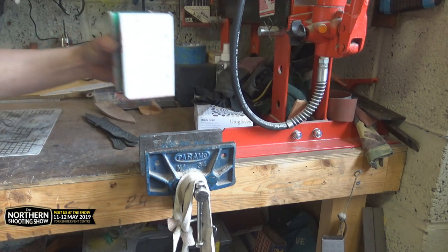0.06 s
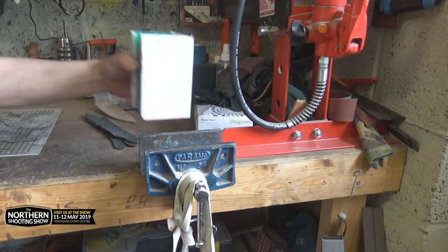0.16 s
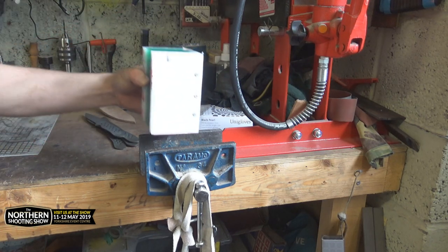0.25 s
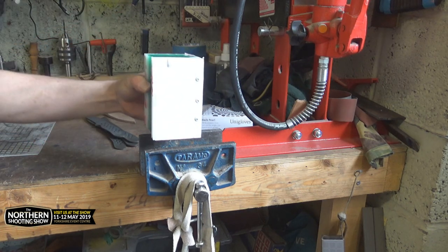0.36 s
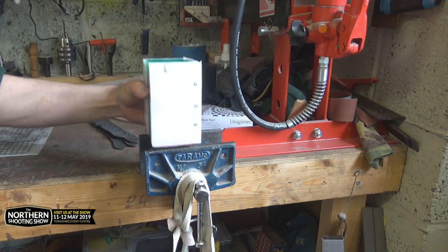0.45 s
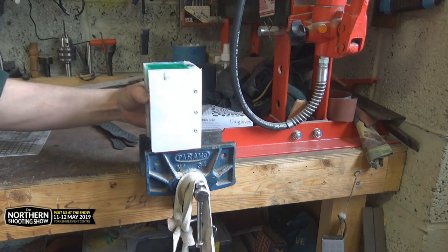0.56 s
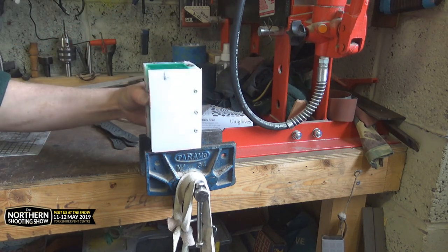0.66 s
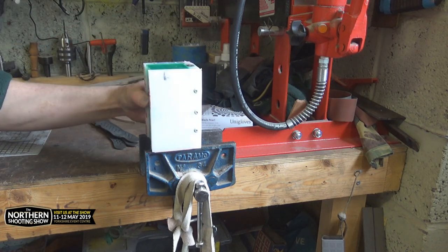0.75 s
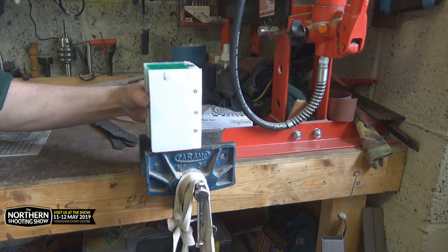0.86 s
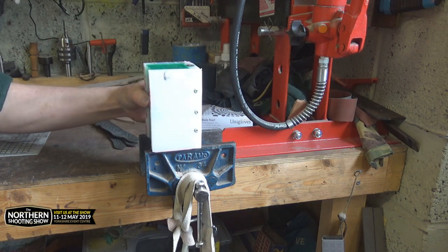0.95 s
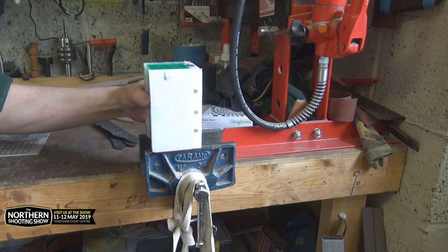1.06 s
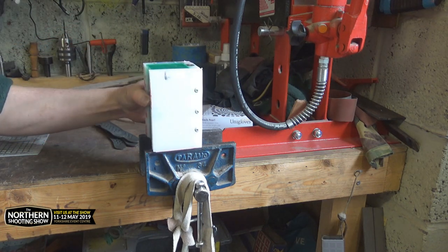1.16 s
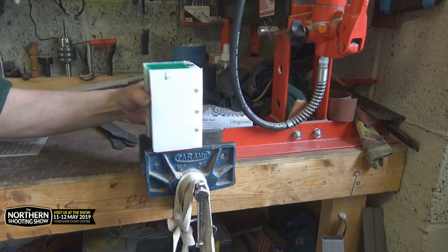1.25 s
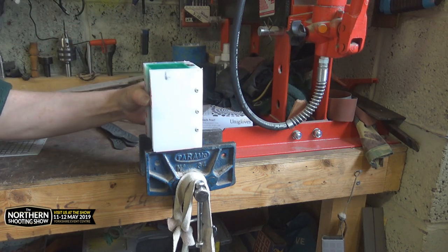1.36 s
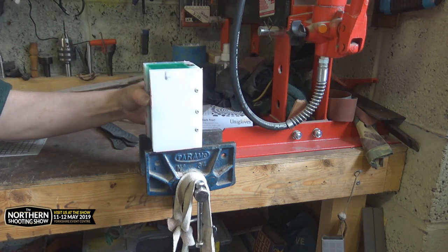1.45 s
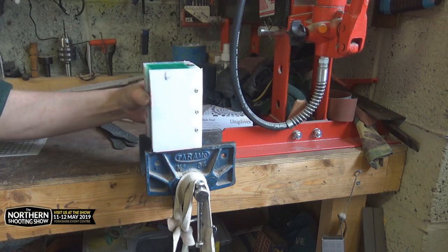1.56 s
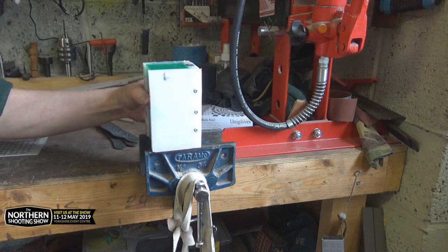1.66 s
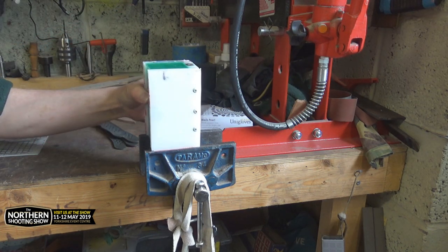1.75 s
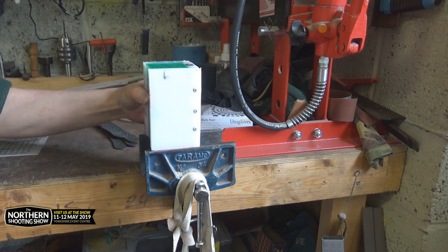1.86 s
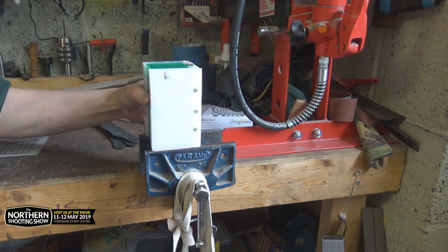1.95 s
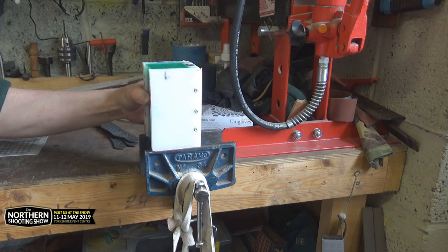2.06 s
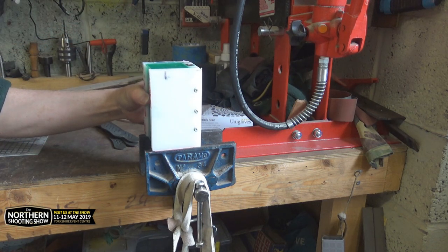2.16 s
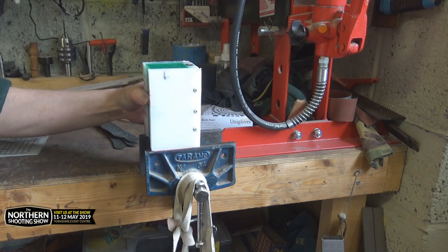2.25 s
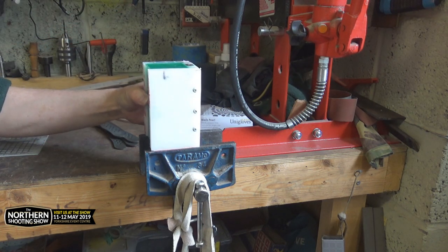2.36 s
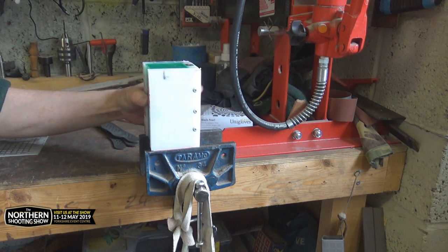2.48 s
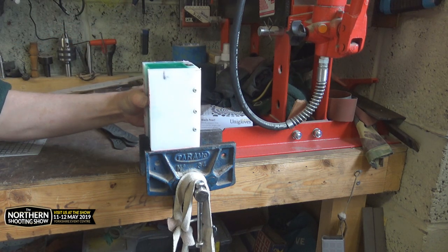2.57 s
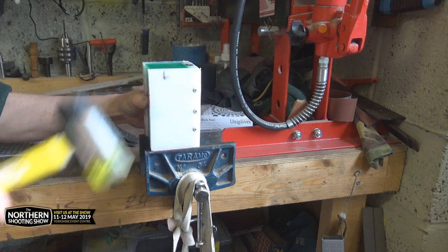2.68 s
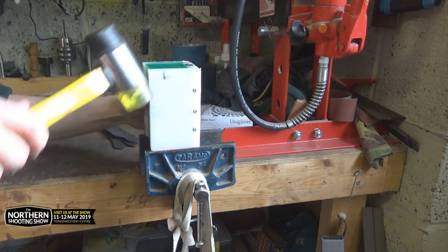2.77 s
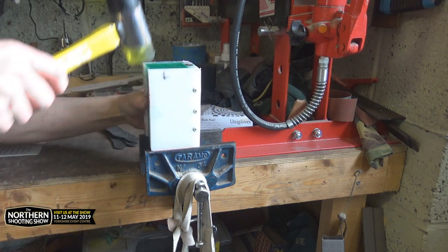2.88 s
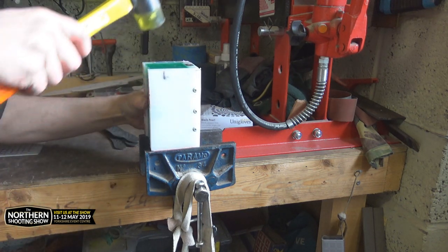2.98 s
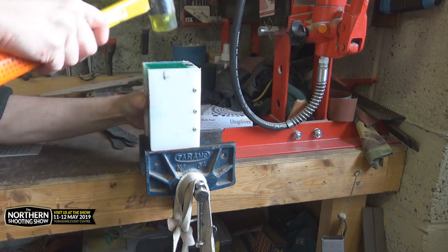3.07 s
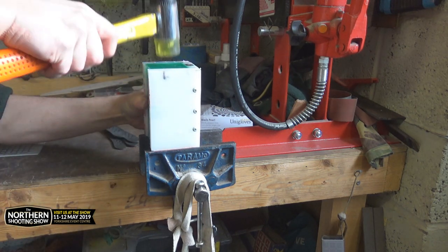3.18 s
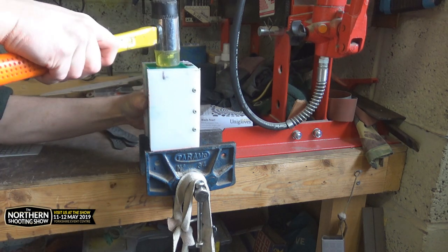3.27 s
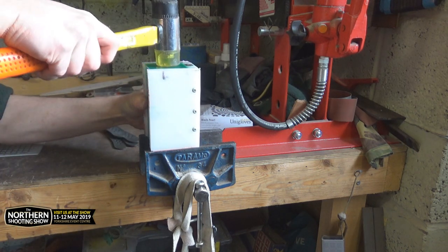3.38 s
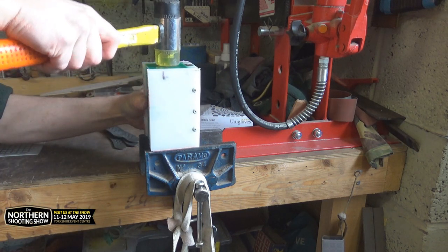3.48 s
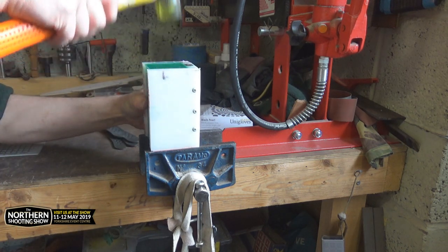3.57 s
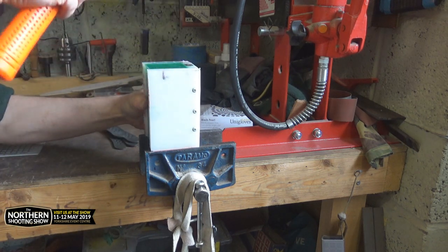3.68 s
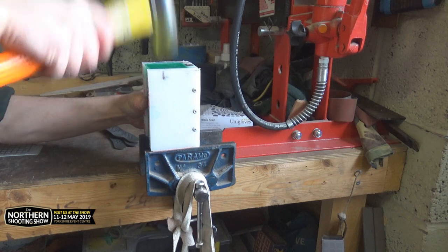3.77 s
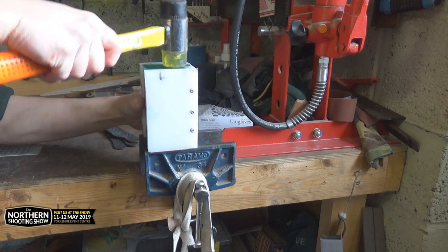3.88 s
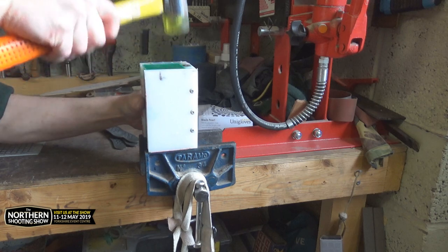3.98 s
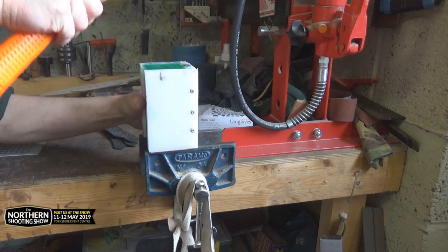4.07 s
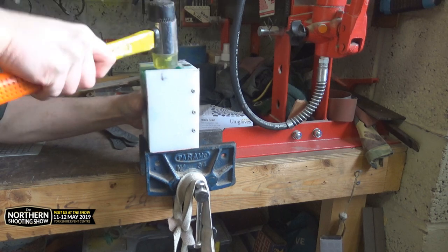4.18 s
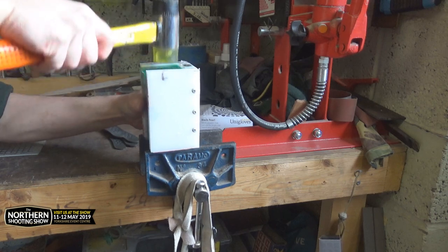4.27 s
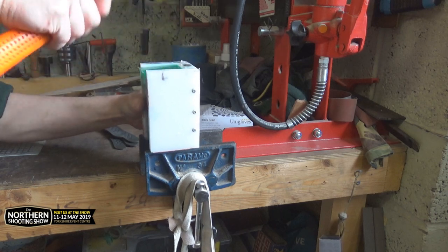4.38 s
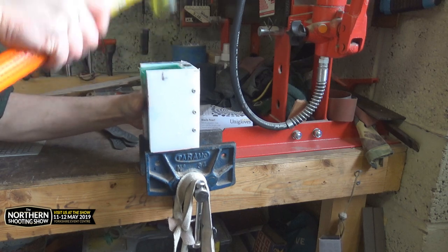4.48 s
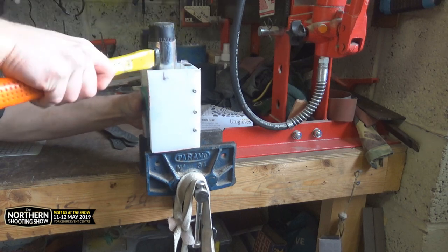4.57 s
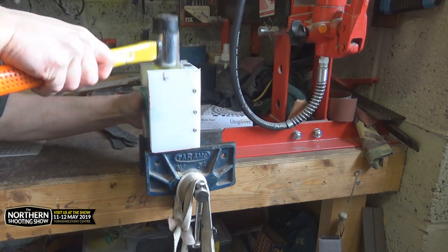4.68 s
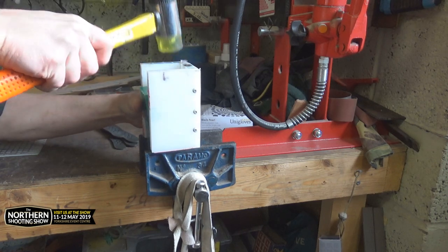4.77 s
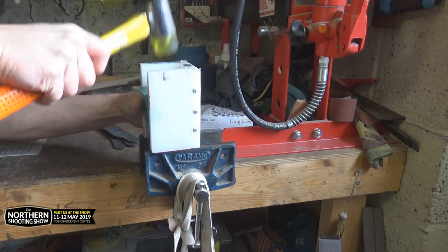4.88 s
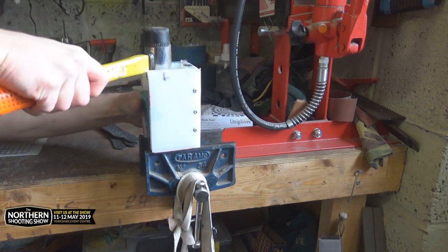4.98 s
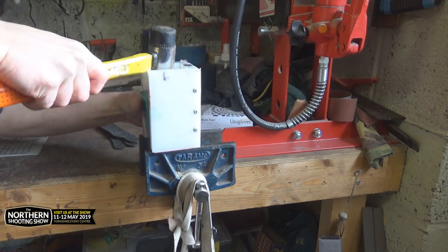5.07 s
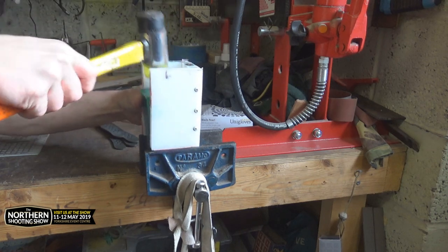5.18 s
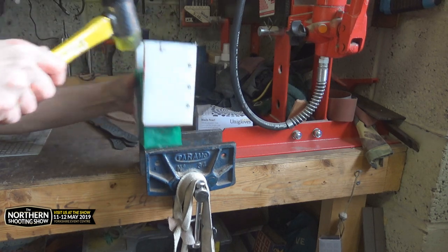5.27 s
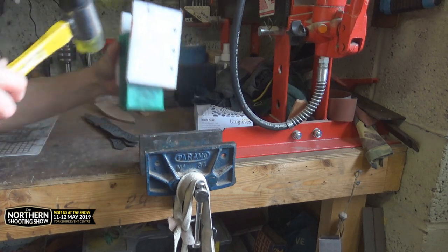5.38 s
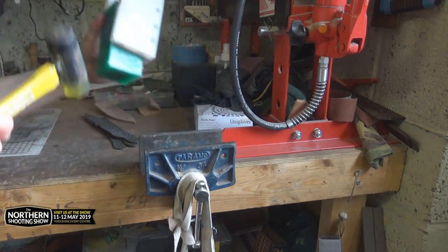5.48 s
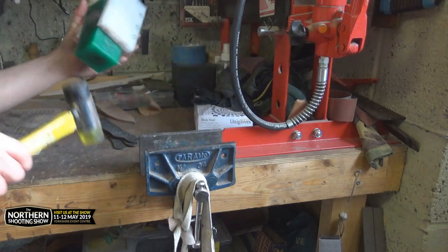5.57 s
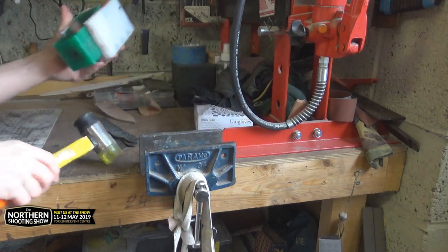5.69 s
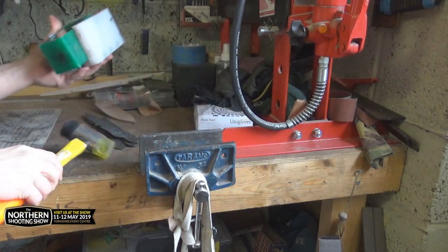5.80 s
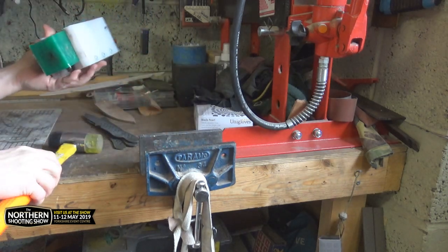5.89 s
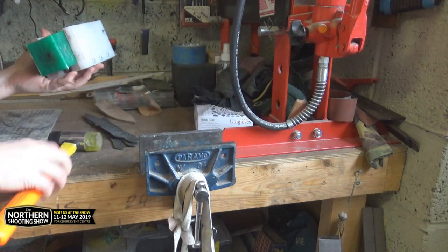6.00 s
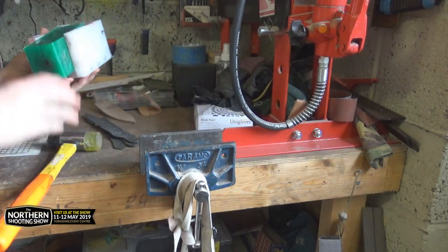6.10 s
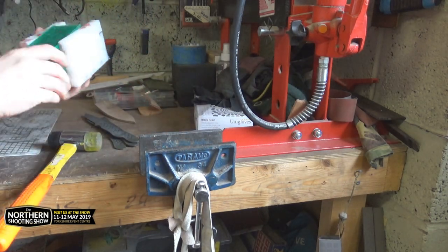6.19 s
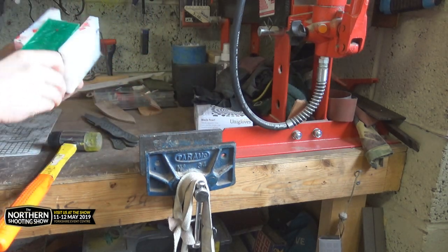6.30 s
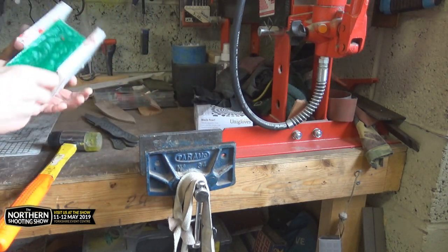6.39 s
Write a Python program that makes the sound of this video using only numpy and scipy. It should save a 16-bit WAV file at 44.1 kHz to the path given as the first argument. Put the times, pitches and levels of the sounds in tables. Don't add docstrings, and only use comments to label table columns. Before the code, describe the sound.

Cloth and hand rustle, then one solid knock of plastic on metal. Quiet room hiss and a fast buzzing tick of a focus motor beside the microphone fill the pause, with a slight nudge. A mallet cracks on the mould's rim five times, the middle three hardest, with rattling metallic edges and short room echoes. Soft scrapes release the block; a woody clatter ends it in the compact stone-walled workshop.

```python
import sys
import numpy as np
from scipy import signal
from scipy.io import wavfile
from scipy.ndimage import uniform_filter1d

SR = 44100
rng = np.random.default_rng(int(sys.argv[2]) if len(sys.argv) > 2 else 0)


def elevation(decibels):
    levels = np.asarray(decibels, float)
    return 10 ** (levels / 20)


def log_audio(samples):
    frames = np.atleast_2d(samples).T
    limited = np.clip(frames, -1, 1)
    pcm = np.round(limited * 32767).astype(np.int16)
    wavfile.write(sys.argv[1], SR, pcm)


N = 284004

BAND_EDGES_HZ = 22.5 * 2 ** np.arange(0, 9.8, 1 / 3)
CENTRES_HZ = np.sqrt(BAND_EDGES_HZ[1:] * BAND_EDGES_HZ[:-1])

# freq_hz, t60_s
ROOM_T60 = [(100, 0.45), (260, 0.37), (700, 0.39), (1840, 0.32), (4850, 0.33), (12800, 0.27)]
# freq_hz, likeness (1 = mono)
LIKENESS = [(60, 0.93), (150, 1), (380, .92), (950, 0.66), (2380, 0.64), (5980, 0.73), (15000, 1)]
# freq_hz, level_db
AIR_COLOUR = [(18, -44), (32, -11), (62, -6), (100, -11), (145, -9), (194, -9.5), (245, -7.5), (404, -1.5),
              (449, -2), (913, 4), (2350, -6.5), (2980, -6.5), (3310, -4.5), (3670, -7), (14800, -16),
              (16000, -29)]
# pitch_hz, rms_db
WHINES = [(202, -83.5), (7812, -82)]
# peak_s, hiss_db, rise_20db_s, fall_20db_s
RUSTLES = [(.02, -62, .05, .7), (.145, -60, .02, .3), (.45, -60, .09, .5), (1.785, -64, .012, .1),
           (1.96, -70, .15, .1), (2.26, -70, .06, .08), (2.5, -66, .2, .08), (2.77, -65, .5, .03),
           (2.845, -60, .08, .05), (2.902, -59, .02, .14), (5.64, -61, .13, .5), (5.69, -59, .15, .03),
           (6.35, -55, .07, .12)]
# freq_hz, level_db
CLOTH_COLOUR = [(880, -35), (1500, -5), (1620, -8.5), (3090, 1.5), (3350, 0.5), (4730, 1), (8320, 4.5),
                (16000, -16.5)]
# start_s, peak_db, pitch_hz
SNAPS = [(0.1423, -51, 1620), (0.156, -45, 2300), (0.2028, -54, 1670), (0.4338, -47, 6800),
         (0.5368, -50, 3500), (0.7586, -37, 2900), (0.7864, -62, 1510), (0.8058, -41, 11000),
         (1.7713, -53, 3330), (2.2696, -50, 1900), (2.615, -57, 3330), (2.6442, -49, 3250),
         (2.757, -49, 2400), (2.8975, -52, 7240), (5.306, -32, 1510), (5.3731, -28.5, 1730),
         (5.378, -34, 3900), (5.4022, -38, 1700), (5.4354, -54, 2010), (5.8698, -39, 5700),
         (5.9305, -43, 1530), (5.9803, -36, 2200), (6.175, -20, 900), (6.336, -46, 9000), (6.35, -40, 6200)]

# start_s, peak_db, spot_hz, echo_share_db, body_ring_db
SET_DOWN = [
    (0.629, -13, 1000, -6.5, -1),
]
NUDGED = [
    (1.943, -38, 700, -4, 2),
    (1.965, -44, 160, -6, 2),
]
BLOCK_SLIP = [
    (5.304, -33, 357, -7, 0),
    (5.362, -35, 1370, -2, -2.3),
    (5.374, -25, 304, -7, -1),
    (5.376, -35, 3700, -2, -8),
    (5.401, -40, 1500, -6, -2),
    (5.433, -33, 392, -10, 0),
]
LAID_DOWN = [(5.872, -28.5, 400, -9, 4.5), (5.93, -27, 1500, -8, -10), (5.957, -29, 900, -14.5, -7),
             (5.981, -37, 2100, -3, 5), (6.018, -19, 385, -6.5, -5), (6.023, -8, 600, -3, -2.5),
             (6.078, -18.5, 347, -20.5, -9), (6.173, -23, 1000, -9, -14), (6.207, -22, 335, -7, -3),
             (6.214, -17, 330, -6, 0), (6.263, -31, 260, -20, 8), (6.348, -40, 2500, -2, -5)]
# start_s, strength_db (before limiter), echo_share_db, vice_ring_db, jaw_landing_ms
BLOWS = [
    (3.348, -7.5, -8.5, -5, 4.2),
    (3.9256, 7, -4, -4, 8.5),
    (4.3006, 8.5, -9.5, -8, 9.5),
    (4.647, 7.5, -13, -21, 8),
    (5.058, -11.5, -0.5, -15, 7),
]

# freq_hz, level_db_per_hz
MOULD_FOOT_COLOUR = [(53, -75), (90, -48.5), (153, -5.5), (333, -13), (403, 3.5), (439, -14), (519, -3.5),
                     (565, -5), (1000, -4.5), (1560, -20), (4480, -27), (14000, -51.5)]
NUDGE_COLOUR = [(35, -79), (60, -49), (151, -10), (356, -7), (403, -14), (446, 2), (842, -7), (1190, -19),
                (8000, -40), (10400, -71), (17600, -120)]
BLOCK_COLOUR = [(35, -69), (60, -42), (303, 2.5), (644, -3), (772, -11), (1090, -4.5), (1370, -9),
                (2470, -20.5), (8100, -23.5), (14000, -52.5)]
BENCH_TOP_COLOUR = [(35, -78), (60, -48), (143, 0.5), (188, 4.5), (348, 2.5), (886, 2.5), (1340, -6),
                    (2840, -11), (9080, -29), (14000, -50.5)]
FIRST_BLOW_COLOUR = [(59, -53), (100, -29.5), (376, -6), (408, -7.5), (443, -13.5), (759, -2.5), (972, -9),
                     (1080, -10), (1960, -20.5), (8700, -27), (11600, -35.5), (14000, -93.5)]
HARD_BLOW_COLOUR = [(59, -60.5), (100, -45.5), (295, -4), (492, -10.5), (621, 1), (1950, -2), (2690, -5.5),
                    (4870, -10), (5900, -4), (12700, -18), (15000, -83), (16000, -75)]
LATE_BLOW_COLOUR = [(59, -60), (100, -27.5), (224, -11.5), (275, -13), (523, -2.5), (580, -4.5), (774, 4),
                    (1010, 3), (1410, 5), (2970, -8.5), (8520, -1.5), (14000, -59)]
LAST_BLOW_COLOUR = [(59, -65), (100, -32), (254, -20.5), (299, -10.5), (523, -12), (656, -4.5), (1170, -2),
                    (2680, -15), (2970, -11.5), (3890, -19), (8700, -12.5), (12400, -40)]

# freq_hz, level_db, t60_s (as heard in the room)
MOULD_ON_VICE_MODES = [(278.6, -5.5, 0.5), (420, -8.5, 0.62), (565, -1, 0.29), (643, -13, 1.04),
                       (888, -0.5, 0.09), (917, 9.5, 0.097), (1080, -7.5, 0.25), (1870, -24.5, 0.19),
                       (2490, -22, 0.34)]
MOULD_HELD_MODES = [(159, -6, 0.6), (268, -1.5, 0.44), (412, 3.5, 0.67), (497, -22, 0.89), (820, -16, 0.36),
                    (1001, -13, 0.31)]
CAST_BLOCK_MODES = [(312, 6, 0.2), (790, 7.5, 0.072), (1520, -3, .1), (1690, -10, 0.084), (2000, -14, .08),
                    (2520, -14, .06), (3898, -4, 0.04), (4450, -6, 0.04), (4861, -12, 0.04)]
BENCH_MODES = [(146, -11, .3), (258, -5, .25), (345, 1, 0.25), (425, -2, .4), (493.4, -2, 0.31),
               (913, -15, 0.35), (1600, -23, 0.89), (1960, -38, 0.24), (2200, -17, 0.21), (2196, -37, 0.63)]
MOULD_MODES = [(411, -11.5, 0.76), (483, -16, 0.78), (775, 3.5, 0.1), (1360, -8.5, 0.17),
               (1854, -37.5, 0.75), (2215, -17.5, 0.13), (3190, -37, 0.32), (4506, -16.5, 0.21)]
VICE_MODES = [(5720, -3, .06), (5820, -2, .09), (5880, -1, .11), (5960, -4, .05), (8440, -7, .025),
              (11380, 2, .03)]


def rms_one(x):
    return x / np.sqrt(np.mean(x ** 2) + 1e-20)


def at_hz(points, hz):
    table = np.array(points)
    return np.interp(np.log(hz), np.log(table[:, 0]), table[:, 1])


def add(track, start_s, sound):
    i = round(start_s * SR)
    track[..., i:i + sound.shape[-1]] += sound[..., :N - i]


def drift(rate_hz):
    knots = rng.standard_normal(400)
    return np.interp(np.arange(N) / SR * rate_hz, np.arange(400), knots)


def noise_bands():
    white = rng.standard_normal((2, 2, N + 20000))
    bands = []
    for k, pair in enumerate(zip(BAND_EDGES_HZ, BAND_EDGES_HZ[1:])):
        band = signal.butter(2, pair, "band", fs=SR, output="sos")
        bands.append(signal.sosfilt(band, white[k % 2]))
    return np.array(bands, dtype=np.float32)


def stereo(mid_side, gains, spread):
    alike = np.clip(at_hz(LIKENESS, CENTRES_HZ) - spread, -1, 1)
    mid = np.float32(gains * np.sqrt(1 + alike)) @ mid_side[:, 0]
    side = np.float32(gains * np.sqrt(1 - alike)) @ mid_side[:, 1]
    return np.array([mid + side, mid - side])


def ring(push, hz, t60_s):
    r, w = elevation(-60 / (t60_s * SR)), 2 * np.pi * hz / SR
    return signal.lfilter([0, np.sin(w)], [1, -2 * r * np.cos(w), r * r], push + 1e-18)


def struck(modes, push_s, damping):
    t = np.arange(9000) / SR
    push = t * np.exp(-t / push_s) * (t < 12 * push_s)
    body = np.zeros(len(t))
    for hz, db, t60_s in modes:
        gain = elevation(db + rng.normal(0, 1.1)) * rng.choice([-1, 1])
        body += gain * ring(push, hz, min(t60_s, .5) * damping)
    return body / np.abs(body).max()


def knock(noise, colour_db, rise_s, contact_s, echo_db, size):
    t = np.arange(size, dtype=np.float32) / SR
    centres = CENTRES_HZ[:, None]
    gains = elevation(colour_db)
    bass_lag_s = .012 * (150 / centres) ** 2
    short_s = np.maximum(contact_s, 0.81 / centres)
    crack = (1 - np.exp(-t / (rise_s + 0.6 / centres + bass_lag_s))) * np.exp(-t / short_s)

    echoes = elevation(echo_db - 60 * t / at_hz(ROOM_T60, centres))
    echoes = echoes * (1 - np.exp(-t / (short_s + 0.00073 + bass_lag_s)))
    lumps = rng.standard_normal((len(CENTRES_HZ) // 3 + 1, 60)).repeat(3, axis=0)[:len(CENTRES_HZ)]
    ragged = np.array([np.interp(t * 110, np.arange(60), row) for row in lumps])
    echoes = echoes * elevation(1.2 * ragged)

    start = rng.integers(20000, N - 20000)
    piece = noise[:, :, start:start + size]
    direct = stereo(piece * np.float32(crack[:, None]), gains, -0.42)
    reflected = stereo(piece[:, :, ::-1] * np.float32(echoes[:, None]), gains, 0.017)
    return (direct + reflected) / np.sqrt(gains ** 2 @ CENTRES_HZ / SR)


def workshop(x, wet_db):
    t = np.arange(18000) / SR
    envelope = elevation(-60 * t / 0.32) * (1 - np.exp(-t / 0.0047))
    mid, side = rng.standard_normal((2, len(t))) * envelope
    dull = signal.butter(2, 8000, fs=SR, output="sos")
    tail = signal.sosfilt(dull, [mid + 0.51 * side, mid - 0.17 * side])
    return x + elevation(wet_db) * signal.fftconvolve(x[None], tail, axes=1)[:, :N]


def room_air(noise):
    return elevation(-61.5) * rms_one(stereo(noise, elevation(at_hz(AIR_COLOUR, CENTRES_HZ)), 0.17))


def electric_whine():
    t = np.arange(N) / SR
    return sum(elevation(db + 1.5 + 2.5 * drift(11)) * np.sin(2 * np.pi * hz * t) for hz, db in WHINES)


def focus_motor():
    start_s, rate_hz = .7275, 24.983
    hunt_s, hunt_width_s, hunt_db = 2.1, 1.0, 6.5
    out, t = np.zeros(N), np.arange(900) / SR
    click = (t == 0) * 1.
    tick = ring(click, 2750, 0.013) + 0.31 * ring(click, 3880, 0.023) + .3 * ring(click, 6100, .004)
    swell_shape = t / 0.0033 * np.exp(1 - t / 0.005 - (t / 0.0063) ** 2)
    for s in np.arange(start_s, 6.4, 1 / rate_hz):
        luck = rng.normal(0, 1, 4)
        effort_db = hunt_db * (np.exp(-((s - hunt_s) / hunt_width_s) ** 2) - .5)
        hz = 3335 + 80 * np.clip(s - hunt_s, -2, .4) + 25 * luck[3]
        swell = swell_shape * np.sin(2 * np.pi * hz * t)
        low_db = -54.5 - .5 * effort_db
        add(out, s, elevation(low_db + 2.1 * luck[0]) * tick)
        add(out, s + 0.023, elevation(low_db - 12 + 5.2 * luck[1]) * tick)
        add(out, s + 0.00141, elevation(-60.5 + effort_db + 1.2 * luck[2]) * swell)
    return out * elevation([[-1.5], [1.5]])


def rustle(noise):
    t = np.arange(N) / SR
    carry_end_s, carry_rub_db, later_rub_db = .62, 0, -9
    swells_db = [db - 20 * np.maximum((s - t) / rise_s, (t - s) / fall_s)
                 for s, db, rise_s, fall_s in RUSTLES]
    hiss_db = np.max(swells_db, axis=0)
    rub_db = hiss_db + np.where(t < carry_end_s, carry_rub_db, later_rub_db)
    cloth_gains = elevation(at_hz(CLOTH_COLOUR, CENTRES_HZ)) * (CENTRES_HZ > 1400)
    hiss = rms_one(stereo(noise, cloth_gains, 0.067))
    rub = rms_one(stereo(noise, elevation(-9 * np.abs(np.log2(CENTRES_HZ / 1100))), 0.11))
    return elevation(hiss_db + 1.5 * drift(60)) * hiss + elevation(rub_db) * rub


def snaps():
    out, fade = np.zeros(N), np.exp(-np.arange(1500) / 70)
    for s, peak_db, hz in SNAPS:
        puff = rng.standard_normal(1500) * fade
        broad = signal.butter(2, [hz / 2, min(3.5 * hz, 16000)], "band", fs=SR, output="sos")
        snap = ring(puff, min(hz, 15500), 7 / hz) + 0.95 * signal.sosfilt(broad, puff)
        add(out, s, elevation(peak_db) * snap / np.abs(snap).max())
    return out


def contacts(noise, events, colour, modes, rise_s, contact_s, tilt_db):
    cracks, rings = np.zeros((2, N)), np.zeros(N)
    first_peak_db = events[0][1]
    for s, peak_db, hz, echo_db, body_db in events:
        spot_db = 7 * np.exp(-(np.log2(CENTRES_HZ / hz) / 0.55) ** 2)
        slope_db = tilt_db + .07 * (peak_db - first_peak_db)
        colour_db = at_hz(colour, CENTRES_HZ) + spot_db + slope_db * np.log2(CENTRES_HZ / 1000)
        size = 15000 if peak_db > -21 else 8000
        crack = knock(noise, colour_db, rise_s, contact_s, echo_db, size)
        add(cracks, s, elevation(peak_db - 4.5) * crack)
        add(rings, s, elevation(peak_db + body_db) * struck(modes, 0.00005, damping=0.26))
    return cracks, rings


def mallet(noise):
    mould_ring_db, tick_db, tick_decay_s = -9, -30, .002
    cracks, rings = np.zeros((2, N)), np.zeros(N)
    tick_fade = np.exp(-np.arange(600) / SR / tick_decay_s)
    colours = [FIRST_BLOW_COLOUR, HARD_BLOW_COLOUR, HARD_BLOW_COLOUR, LATE_BLOW_COLOUR, LAST_BLOW_COLOUR]
    for (s, blow_db, echo_db, vice_db, jump_ms), colour in zip(BLOWS, colours):
        dull = signal.butter(10, .86 * colour[-1][0], fs=SR, output="sos")
        crack = knock(noise, at_hz(colour, CENTRES_HZ), 0.00013, 0.007, echo_db, size=18000)
        add(cracks, s, elevation(blow_db) * signal.sosfilt(dull, crack))
        add(rings, s, elevation(blow_db + mould_ring_db) * struck(MOULD_MODES, .00008, damping=0.25))
        vice = struck(VICE_MODES, .00002, damping=0.8)
        add(rings, s + jump_ms / 1000, elevation(blow_db + vice_db) * vice)
        tick = np.diff(rng.standard_normal(600) * tick_fade, 2)
        add(cracks, s, elevation(blow_db + tick_db) * tick)
    return cracks, rings


def scene():
    noise = noise_bands()
    background = room_air(noise[:, :, 20000:]) + electric_whine() + focus_motor() + rustle(noise[:, :, :N])
    struck_things = [
        contacts(noise, SET_DOWN, MOULD_FOOT_COLOUR, MOULD_ON_VICE_MODES, 0.00051, 0.012, tilt_db=1.3),
        contacts(noise, NUDGED, NUDGE_COLOUR, MOULD_HELD_MODES, .0008, 0.0035, tilt_db=1.2),
        mallet(noise),
        contacts(noise, BLOCK_SLIP, BLOCK_COLOUR, CAST_BLOCK_MODES, 0.00016, .0025, tilt_db=.3),
        contacts(noise, LAID_DOWN, BENCH_TOP_COLOUR, BENCH_MODES, 0.0017, 0.007, tilt_db=.6)]
    cracks, rings = (sum(part) for part in zip(*struck_things))
    knocks = cracks + workshop(rings + snaps(), -34.5)
    low_cut = signal.butter(8, 128, "high", fs=SR, output="sos")
    return background + signal.sosfilt(low_cut, knocks)


def limiter(x):
    over_db = np.maximum(20 * np.log10(np.abs(x).max(axis=0) + 1e-9) + 5, 0)
    release_db = 400 * np.arange(N) / SR
    held_db = np.maximum.accumulate(over_db + release_db) - release_db
    return x * elevation(-.96 * uniform_filter1d(np.roll(held_db, -12), size=25))


def starve(x, under_db):
    _, _, z = signal.stft(x, SR, nperseg=1024)
    power = (np.abs(z) ** 2).sum(axis=0)
    treble = power[46:].sum(axis=0)
    for low in range(230, 390, 8):
        bar = treble * elevation(-2 * under_db + rng.normal(0, 5, power.shape[1]))
        z[:, low:low + 8] *= power[low:low + 8].sum(axis=0) > bar
    return signal.istft(z, SR, nperseg=1024)[1][:, :N]


def low_pass(x):
    return signal.sosfilt(signal.butter(12, 16460, fs=SR, output="sos"), x)


def record(dry):
    left, right = limiter(dry)
    side_cut = signal.butter(5, 10500, fs=SR, output="sos")
    side = signal.sosfiltfilt(side_cut, left - right) / 2
    x = (left + right) / 2 + side * [[1], [-1]]
    x = signal.sosfilt(signal.cheby2(18, 60, 16450, fs=SR, output="sos"), x)
    mix = starve(x, under_db=39)
    return low_pass(mix)


dry = scene()
out = record(dry)
log_audio(out)
```